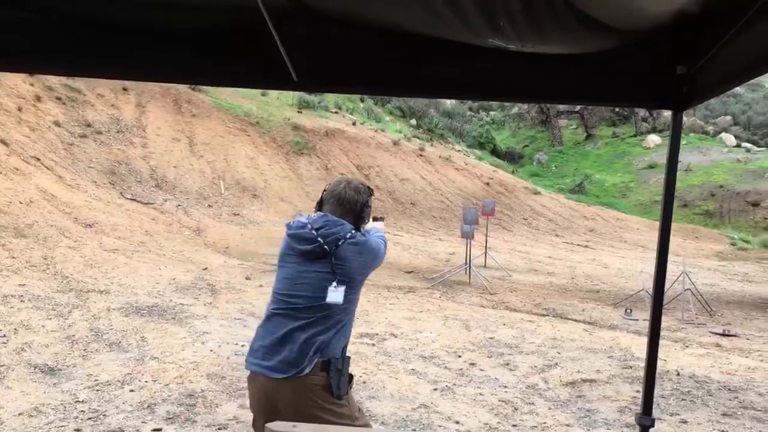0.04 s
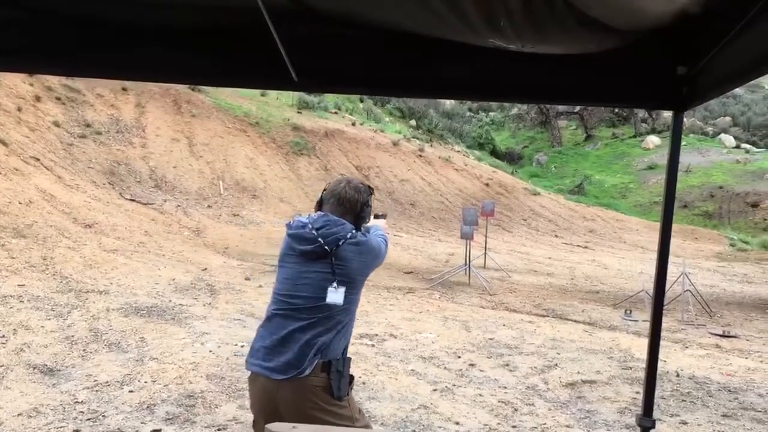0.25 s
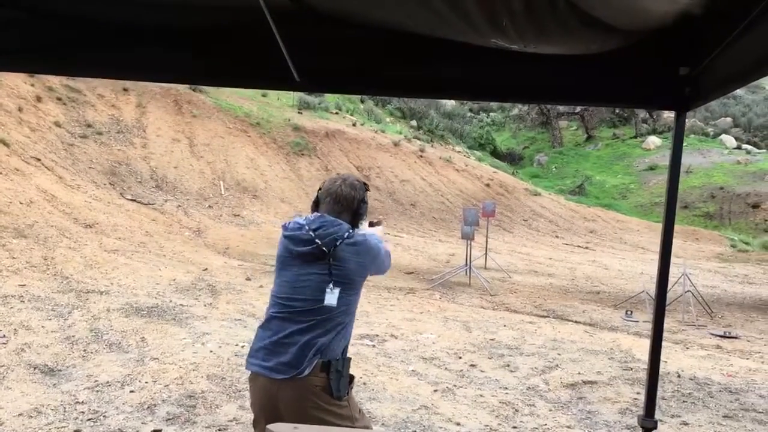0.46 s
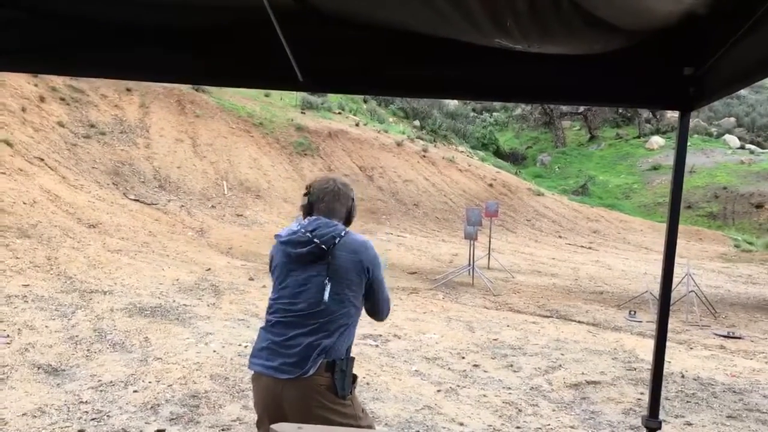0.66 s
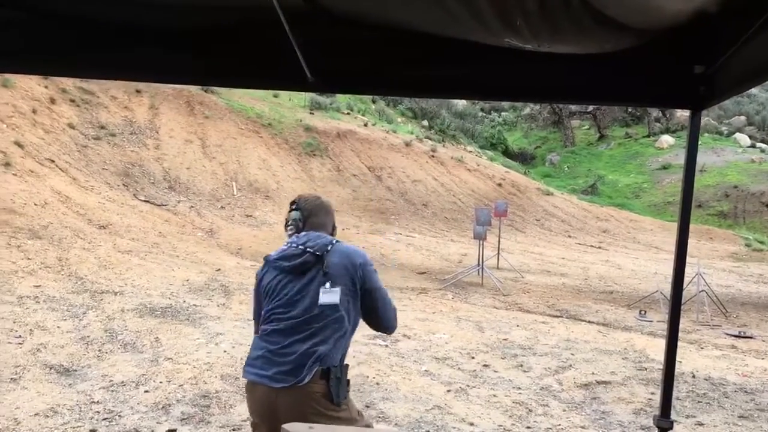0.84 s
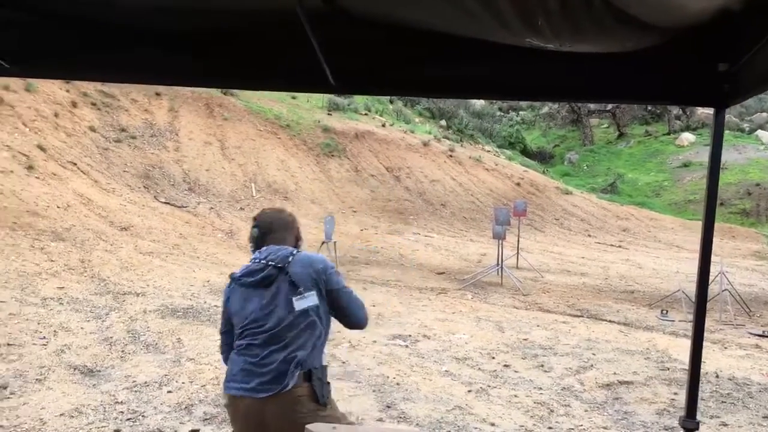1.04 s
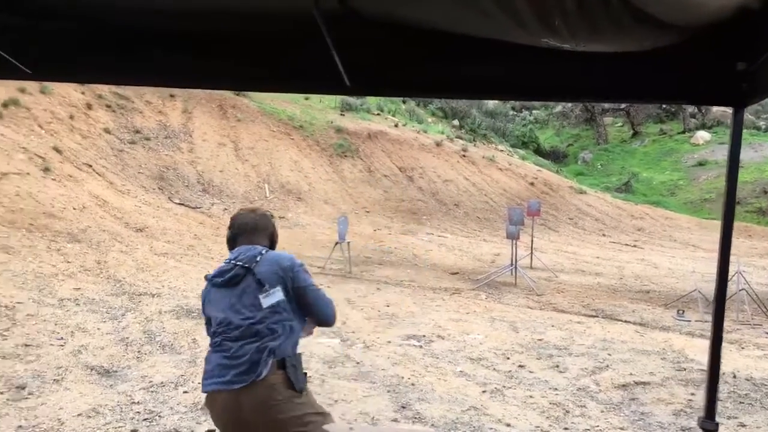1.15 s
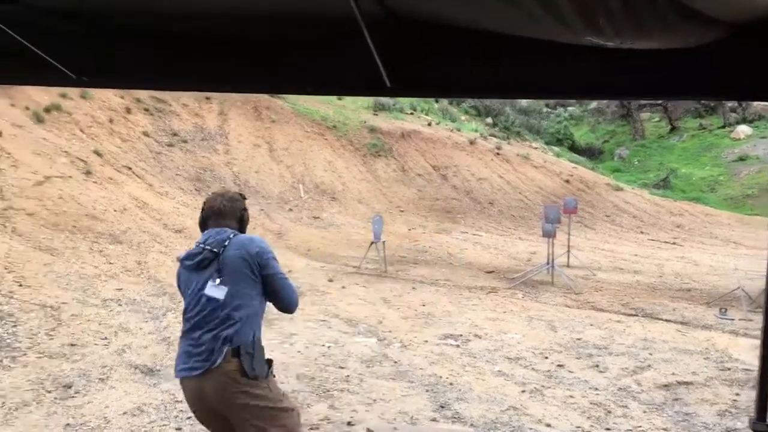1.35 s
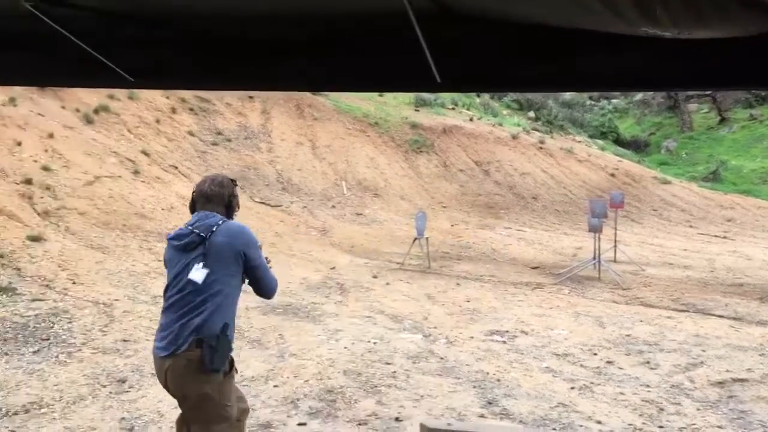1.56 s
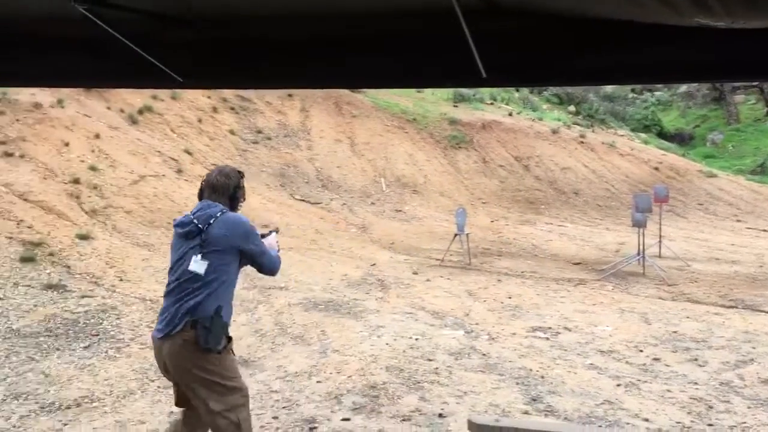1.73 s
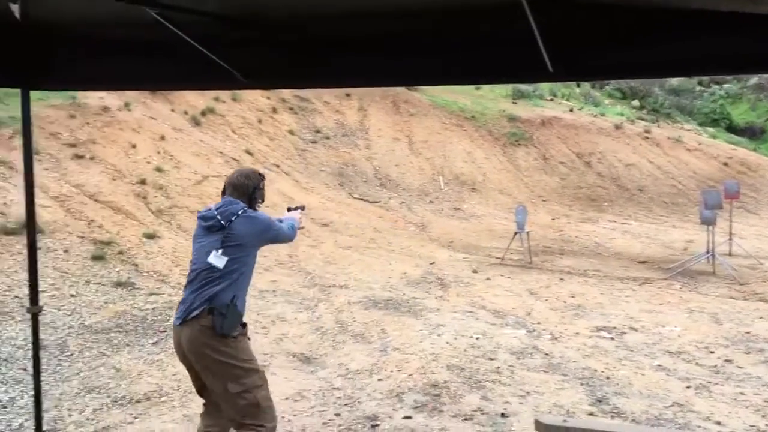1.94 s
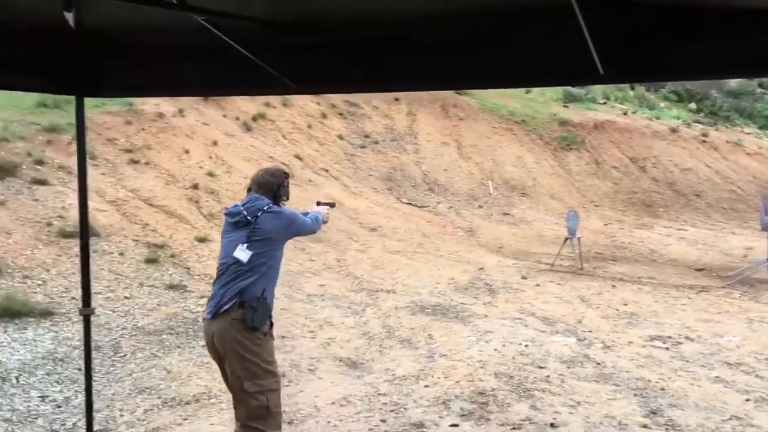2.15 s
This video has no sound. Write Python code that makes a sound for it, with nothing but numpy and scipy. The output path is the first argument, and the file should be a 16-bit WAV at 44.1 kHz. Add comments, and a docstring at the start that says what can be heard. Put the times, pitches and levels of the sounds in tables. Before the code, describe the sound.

Four sharp handgun shots crack in about a second and a half, overloading a close microphone. After each, a steel target rings briefly at its own pitch, while dull echoes wash back from the dirt slopes of an open range.

```python
"""An outdoor range, under a canopy a few metres behind a pistol that fires four shots at steel plates.
Each muzzle blast overloads the microphone and thumps it; some 50 ms later the bullet splashes on a
plate, which rings in its normal modes. The earth banks reflect dull slaps and a long wash. Spent
cases tick on the gravel, and the rumble of other shooting fades underneath."""
import sys
import numpy as np
from scipy import signal
from scipy.fft import rfft, irfft
from scipy.io import wavfile

SR = 44100
rng = np.random.default_rng(int(sys.argv[2]) if len(sys.argv) > 2 else 0)


def output_pcm(signal):
    """Save a mono or channel-first signal as 16-bit PCM at the path in sys.argv[1].

    Samples are clipped to [-1, 1] before scaling.
    """
    pcm = np.clip(np.atleast_2d(signal).T, -1, 1) * 32767
    wavfile.write(sys.argv[1], SR, np.round(pcm).astype(np.int16))


N = 97020
T = np.arange(N) / SR

# Shots. Each row: start in seconds, blast level in dB, hold in seconds, tilt in dB per octave,
# thump level in dB, thump lag in seconds, tail gain in dB, wash gain in dB.
SHOTS = [(0.2114, 0, 0.04, 1, -10, 0.0023, 0, 2), (0.5327, 0, 0.015, 0.55, -6.5, 0.0015, -0.5, -4),
         (1.1435, -1, 0.022, 0.2, -3.5, 0.0033, -1, -0.5), (1.635, -1.5, 0.022, 0.5, -3, 0.0024, 0, 2.5)]
# Bullet strikes, one per plate. Each row: start in seconds, splash level in dB, splash T60 in seconds,
# splash tilt in dB per octave, crack level in dB, thump level in dB, ring gain in dB.
STRIKES = [(0.2768, -12, 0.13, -0.5, -12, -17.5, -1), (.580, -24, 0.23, 1.5, -9, -24.5, 2.5),
           (1.2014, -14.5, 0.075, -1, -8.5, -5.5, 1), (1.6834, -12, 0.082, 1.5, -6, -13.5, 1.5)]
# Modes of four plates and a steel clink. Each row: frequency in Hz, level in dB, T60 in seconds.
PLATE_A = [(1319, -35, .29), (2355, -32, .2), (3580, -20, .35), (3860, -33, .25), (3995, -35, .25),
           (5437, -24, .25), (5593, -34, .24), (6142, -29, .35), (7467, -37, .33), (8436, -21, .39),
           (9335, -34, .18), (10310, -38, .22), (12440, -40, .35), (13080, -37, .2), (14820, -35, .3)]
PLATE_B = [(1292, -24.5, .27), (2410, -32, .22), (2950, -36, .25), (3472, -32, .25), (3700, -35, 1.9),
           (3921, -18.5, .36), (4577, -24.5, .33), (4780, -32, .33), (4955, -33, .3), (5358, -31, .3),
           (6188, -38, .7), (6627, -33, .3), (7607, -41, 1.1), (8440, -42, .95), (8475, -51, 1.3),
           (8875, -38, .25), (11180, -32, .4)]
PLATE_C = [(1986, -31, .2), (2912, -23, .24), (3451, -35, .3), (4360, -39, .35), (5560, -41, .3)]
PLATE_D = [(2470, -17, .09), (3450, -26, .12), (3590, -24, .13), (4328, -27, .19), (6040, -28, .14),
           (6900, -27, .14), (7074, -27, .18), (7321, -24, .09), (9620, -37, .16)]
CLINK_MODES = [(2480, -48.5, 0.43), (3020, -47, 0.18), (3570, -47, 0.44), (5360, -49.5, 0.95)]
# Echoes off the banks. Each row: delay in seconds, level in dB, T60 in seconds.
BANK_ECHOES = [(0.135, -35, 0.077), (.231, -39, .06), (0.3093, -25, 0.075), (0.366, -41, 0.074),
               (.538, -39, 0.047)]
# Spent cases landing. Each row: start in seconds, level in dB.
CASE_LANDINGS = [(1.085, -41), (2.06, -59)]
# Noise spectra. Each row: frequency in Hz, relative spectral density in dB.
FAR_SPECTRUM = [(25, -5), (65, -2.5), (130, -8.5), (380, 0.5), (800, -0.5), (1400, -5), (2200, -9),
                (4000, -20), (7000, -35.5), (15500, -56)]
LEAD_IN_SPECTRUM = [(80, -33), (200, -17), (300, -3.5), (500, -17.5), (1100, -14.5), (1600, -38),
                    (3000, -23.5), (4500, -60), (12000, -63)]
BRASS_SPECTRUM = [(2000, -25), (5000, -10), (9000, -5), (15000, -4.5)]
SLAP_SPECTRUM = [(100, -17), (300, -5), (560, 11), (1000, 8.5), (1400, -11), (2500, -7.5), (5000, -30),
                 (12000, -56)]
RUMBLE_SPECTRUM = [(30, -28), (70, -7), (200, -8), (360, 0), (680, 0), (1000, -0.5), (1500, -10.5),
                   (2600, -10), (5000, -18), (9000, -29), (15500, -43)]
SPLASH_SPECTRUM = [(100, 7.5), (400, -6), (1000, 2), (2500, 3), (4500, 3), (7000, 3.5), (10000, -1.5),
                   (15500, -6.5)]
BLAST_SPECTRUM = [(40, -12), (130, -18.5), (300, 6), (420, -1), (650, 5.5), (1100, 0.5), (1800, -1),
                  (3100, -1), (4600, -8.5), (6800, -9.5), (10500, -15), (15500, -19)]
TAIL_SPECTRUM = [(60, -18), (250, -16.5), (450, -28), (800, 4.5), (1600, -0.5), (3300, 3.5), (5500, -1.5),
                 (9000, -7), (15500, -18)]
WASH_SPECTRUM = [(80, -29), (300, -1), (700, 6), (1500, -2.5), (2600, -1.5), (4200, -2), (7000, -9.5),
                 (9000, -13.5), (11000, -22), (15500, -26)]


def undb(db):
    """Amplitude ratio of a level in decibels."""
    return 10 ** (np.asarray(db) / 20)


def fade(t60, hold=0):
    """Exponential decay: full level for hold seconds, then a fall of 60 dB every t60 seconds."""
    return np.exp(-np.log(1000) * np.maximum(T - hold, 0) / t60)


def swell(peak_s, rise_s, t60):
    """Exponential growth to a peak, then exponential decay."""
    return np.exp(np.minimum(T - peak_s, 0) / rise_s) * fade(t60, hold=peak_s)


def delay(x, seconds):
    """Time shift: the same sound, starting later."""
    return np.concatenate([np.zeros(max(int(seconds * SR), 0)), x])[:N]


def flicker(depth_db, per_s):
    """Random amplitude modulation: the level drifts to a new value per_s times a second."""
    return undb(depth_db * np.interp(T * per_s, np.arange(N), rng.standard_normal(N)))


def noise(spectrum, tilt_db=0):
    """Spectral shaping: white noise takes the spectrum and a tilt per octave, scaled to unit rms."""
    octave = np.log2(np.maximum(np.arange(N // 2 + 1) * SR / N, 1))
    hz, db = np.array(spectrum, float).T
    gain = undb(np.interp(octave, np.log2(hz), db) + tilt_db * octave)
    low_cut = np.minimum(2 ** octave / hz[0], 1) ** 2
    shaped = irfft(rfft(rng.standard_normal(N)) * gain * low_cut, N)
    return shaped / shaped.std()


def ring(modes):
    """Free vibration: struck metal sounds as a sum of damped sinusoids."""
    return sum(undb(db) * fade(t60) * np.sin(2 * np.pi * (hz * T + rng.random()))
               for hz, db, t60 in modes)


def other_bays():
    """Reverberation: earlier shooting dies away as a rolling rumble."""
    return undb(-38.5) * fade(t60=3.9) * flicker(depth_db=1.9, per_s=60) * noise(FAR_SPECTRUM)


def lead_in():
    """Noise transients: a faint burst of hiss and a brief muffled swell lead into the first shot."""
    hiss = undb(-30) * fade(t60=0.1) * noise(SPLASH_SPECTRUM, tilt_db=0.5)
    muffled = undb(-10) * swell(peak_s=0.2067, rise_s=0.0064, t60=0.092) * noise(LEAD_IN_SPECTRUM)
    return delay(hiss, seconds=0.189) + muffled


def cases():
    """Brief impacts have broad spectra: brass ticks faintly on gravel. Steel clinks once."""
    tick = fade(t60=0.011) * noise(BRASS_SPECTRUM)
    ticks = sum(delay(undb(db) * tick, start) for start, db in CASE_LANDINGS)
    return ticks + delay(ring(CLINK_MODES), seconds=0.908)


def terrain():
    """Reflection: the banks return a shot as separate slaps, the far ground as a rolling rumble."""
    slap = noise(SLAP_SPECTRUM)
    slaps = sum(undb(db) * slap * delay(fade(t60, hold=0.0025), lag) for lag, db, t60 in BANK_ECHOES)
    rumble = undb(-41.5) * fade(t60=6) * flicker(depth_db=3.5, per_s=60) * noise(RUMBLE_SPECTRUM)
    return slaps + rumble


def thump(final_hz=44.5, sweep_hz=218, sweep_s=0.004, rise_s=0.0014):
    """Step response: the microphone swings back from a pressure step, ever more slowly."""
    hz = final_hz + sweep_hz * np.exp(-T / sweep_s)
    attack = 1 - np.exp(-T / rise_s)
    return np.sin(2 * np.pi * np.cumsum(hz) / SR) * attack * fade(t60=0.089)


def clang(count=48, low_hz=1504, high_hz=11950, spread_db=2, tilt_db=-2.5):
    """Modal density: the many weak, short modes of a plate and its stand blend into a clang."""
    place, size, life = rng.random((count, 3)).T
    hz = low_hz + place * (high_hz - low_hz)
    db = -41 + spread_db * (2 * size - 1) + tilt_db * np.log2(hz / hz.mean())
    t60 = 0.18 * (0.5 + life)
    return ring(zip(hz, db, t60))


def plates():
    """Impact excitation: each bullet cracks on steel, sprays fragments and sets the plate ringing."""
    out = np.zeros(N)
    for strike, modes in zip(STRIKES, (PLATE_A, PLATE_B, PLATE_C, PLATE_D)):
        start, splash_db, t60, tilt_db, crack_db, thump_db, ring_db = strike
        splash = undb(splash_db) * fade(t60, hold=0.0019) * noise(SPLASH_SPECTRUM, tilt_db)
        crack = undb(crack_db) * fade(t60=0.011, hold=0.00092) * noise(SPLASH_SPECTRUM, tilt_db=-1.5)
        ringing = undb(ring_db) * ring(modes) + clang()
        out += delay(splash + crack + ringing + undb(thump_db) * thump(), start)
    return out


def pistol(front_hz=486, canopy_lag_s=0.017, canopy_width_s=0.0025):
    """Impulse response: each muzzle blast brings dense near reflections, a tail and a hillside wash."""
    out, returns = np.zeros(N), terrain()
    pressure_front = undb(-6) * np.sin(2 * np.pi * front_hz * T) * fade(t60=0.013)
    # Reflections off the canopy briefly swell the burst of near reflections.
    canopy_db = 2.5 * np.exp(-0.5 * ((T - canopy_lag_s) / canopy_width_s) ** 2)
    crack_envelope = undb(-25) * fade(t60=0.007)
    wash_envelope = undb(-40) * swell(peak_s=0.27, rise_s=0.053, t60=0.52)
    for start, blast_db, hold, tilt_db, thump_db, thump_lag, tail_db, wash_db in SHOTS:
        burst_envelope = undb(-10 + canopy_db) * fade(0.12, hold) * flicker(depth_db=1, per_s=514)
        blast = pressure_front + noise(BLAST_SPECTRUM, tilt_db) * (burst_envelope + crack_envelope)
        low_thump = undb(thump_db) * delay(thump(), thump_lag)
        tail = undb(-19.5 + tail_db) * fade(t60=0.49) * noise(TAIL_SPECTRUM)
        wash = undb(wash_db) * wash_envelope * noise(WASH_SPECTRUM)
        out += delay(undb(blast_db) * blast + low_thump + tail + wash + returns, start)
    return out


def scene():
    """Superposition: the pressures of all sources add in one channel."""
    return (pistol() + plates() + cases() + other_bays() + lead_in())[None]


def record(dry):
    """Saturation rounds off the peaks near full scale; a steep low-pass filter cuts the top."""
    ceiling, cutoff_hz = 0.95, 15900
    limited = dry / (1 + (dry / ceiling) ** 4) ** 0.25
    return signal.sosfilt(signal.ellip(10, 0.2, 70, cutoff_hz, fs=SR, output="sos"), limited)


dry = scene()
out = record(dry)
output_pcm(out)
```